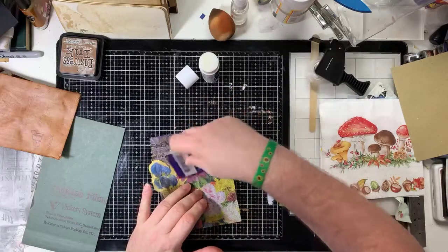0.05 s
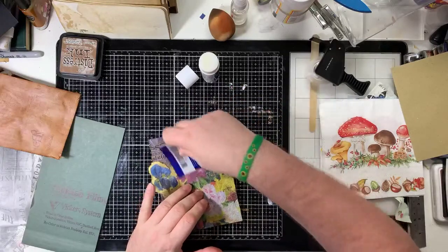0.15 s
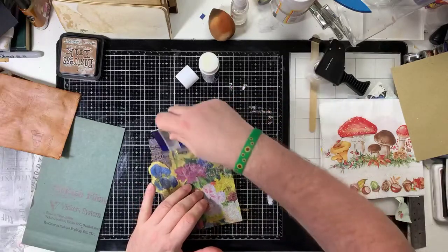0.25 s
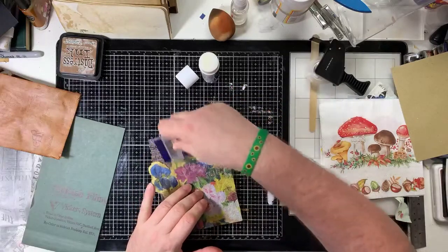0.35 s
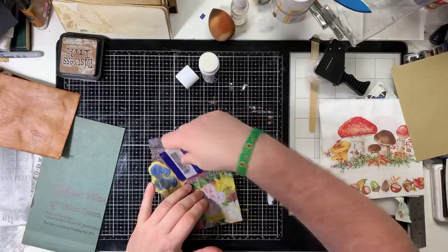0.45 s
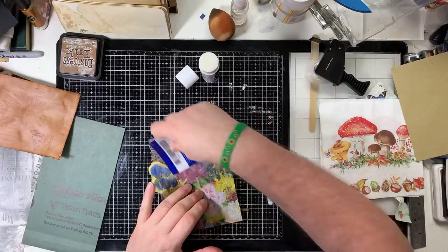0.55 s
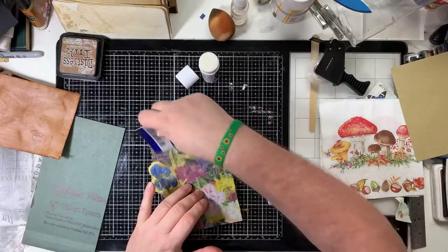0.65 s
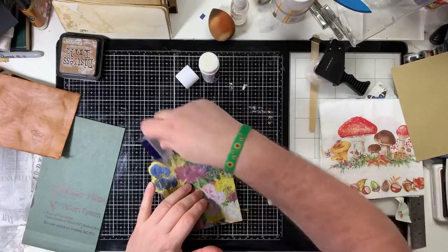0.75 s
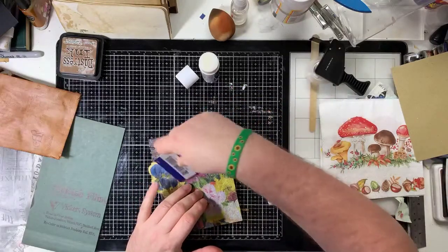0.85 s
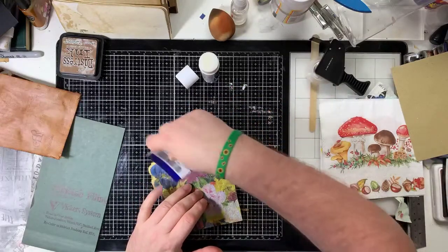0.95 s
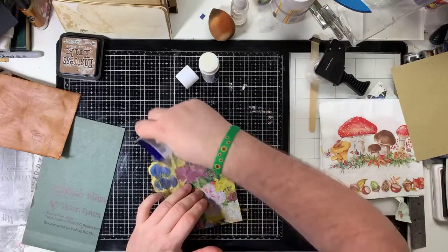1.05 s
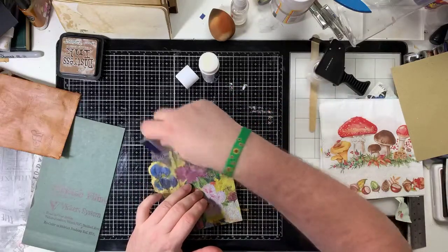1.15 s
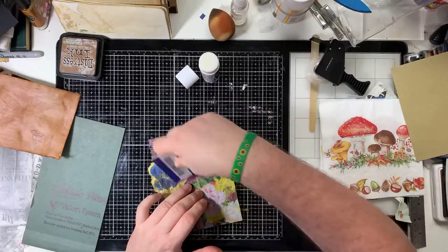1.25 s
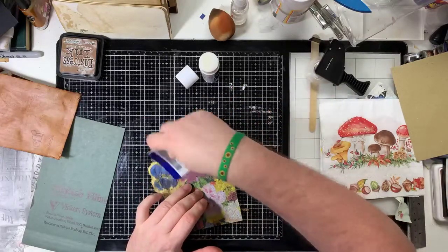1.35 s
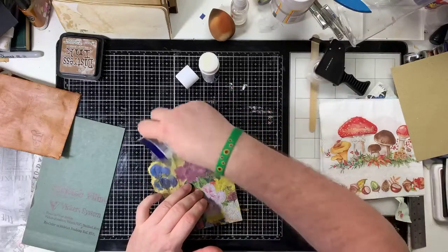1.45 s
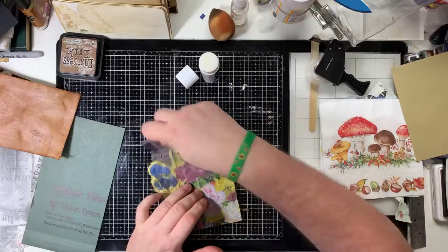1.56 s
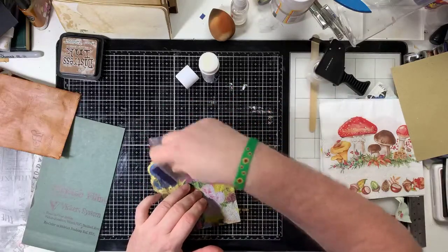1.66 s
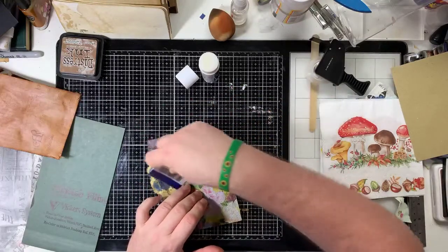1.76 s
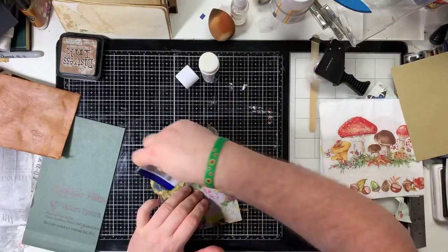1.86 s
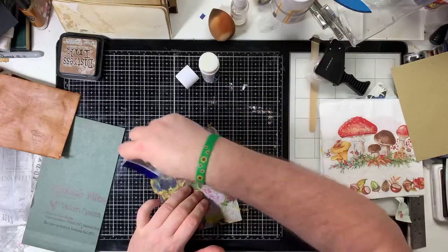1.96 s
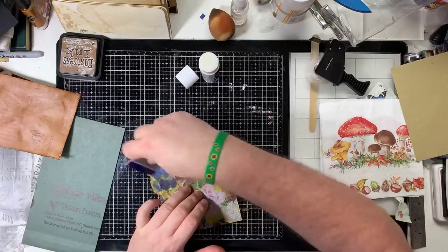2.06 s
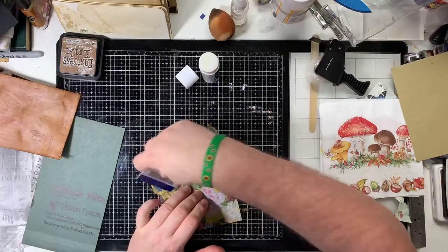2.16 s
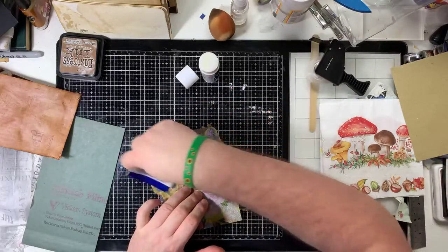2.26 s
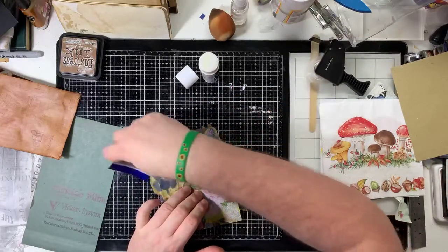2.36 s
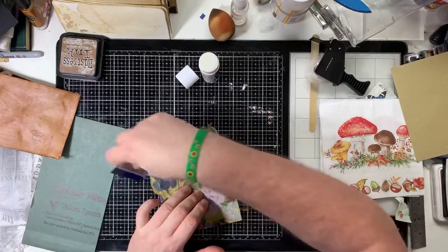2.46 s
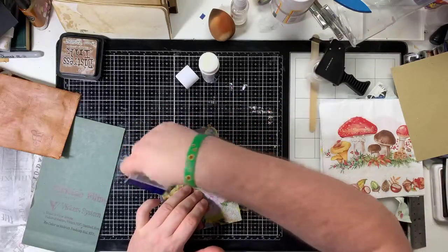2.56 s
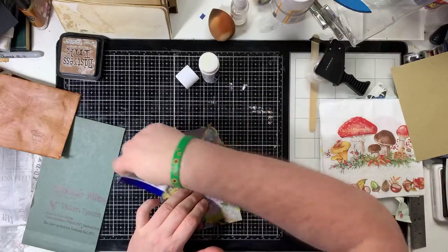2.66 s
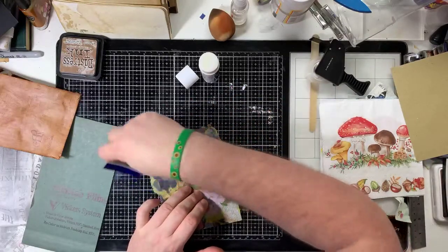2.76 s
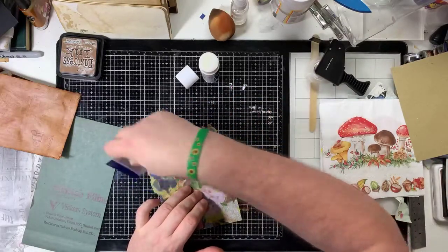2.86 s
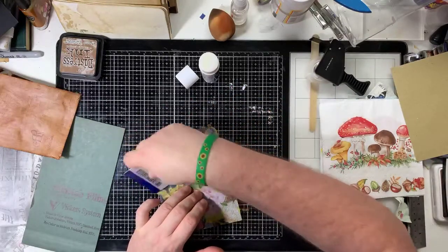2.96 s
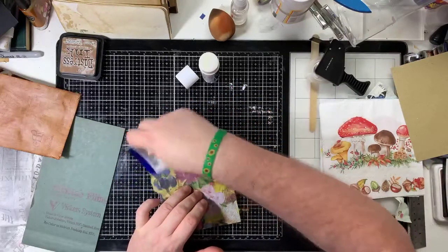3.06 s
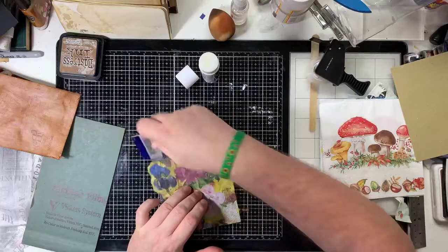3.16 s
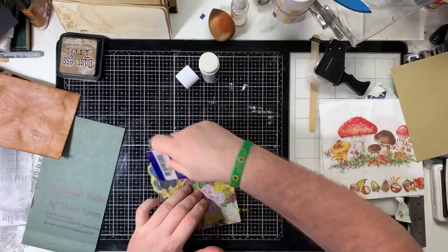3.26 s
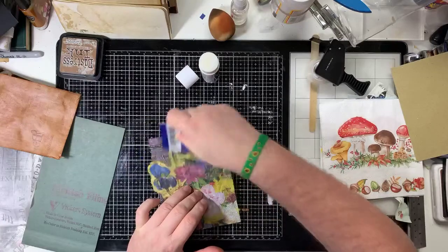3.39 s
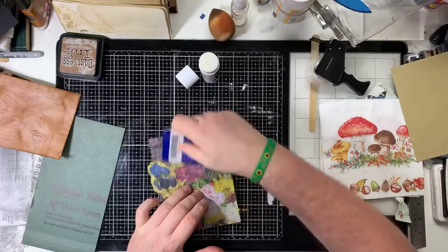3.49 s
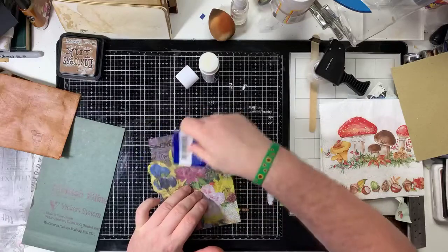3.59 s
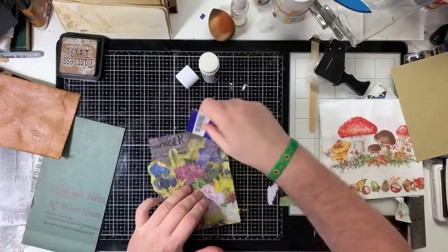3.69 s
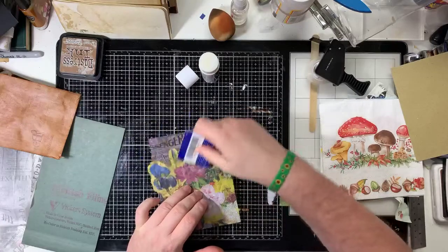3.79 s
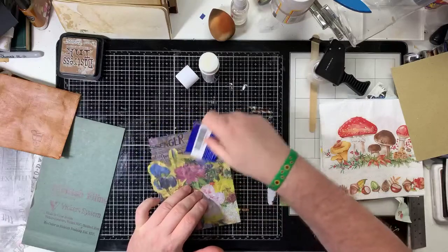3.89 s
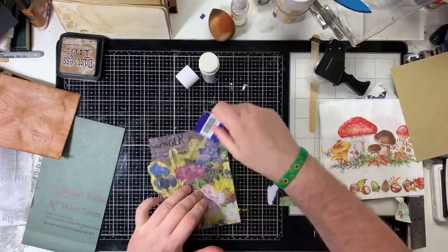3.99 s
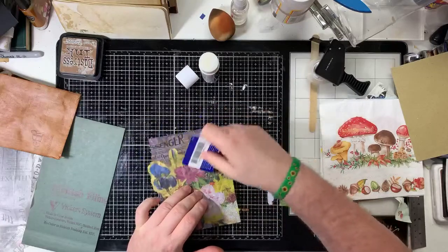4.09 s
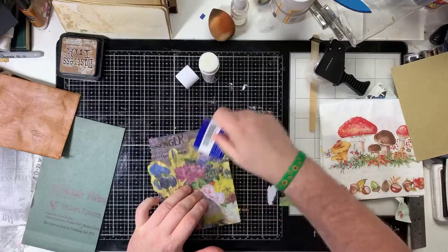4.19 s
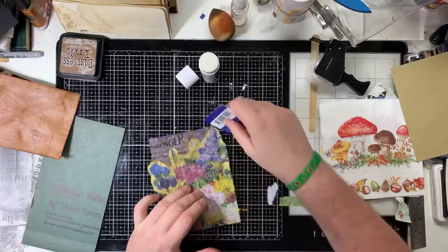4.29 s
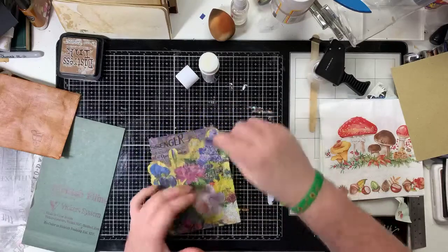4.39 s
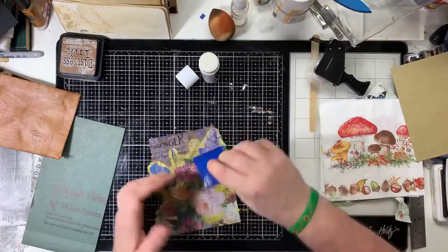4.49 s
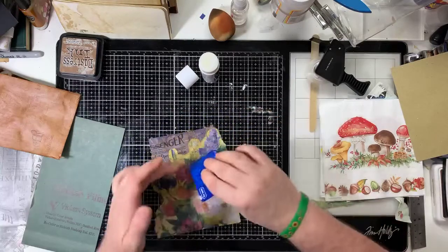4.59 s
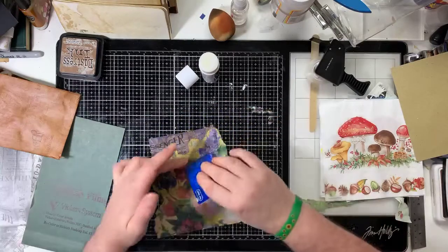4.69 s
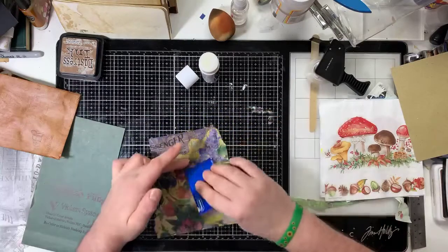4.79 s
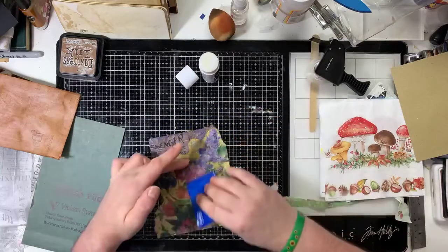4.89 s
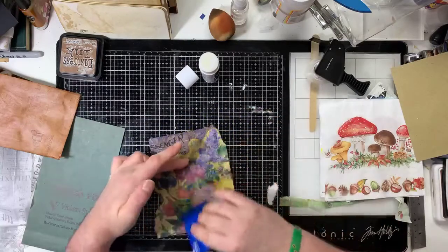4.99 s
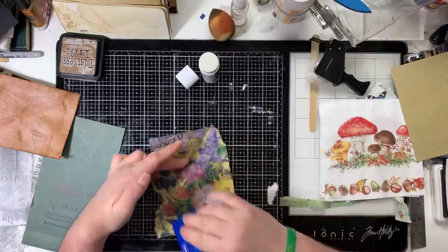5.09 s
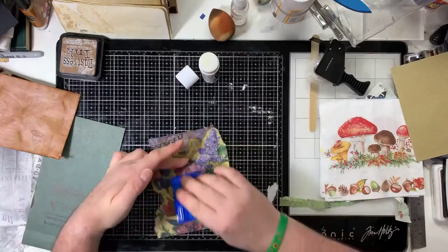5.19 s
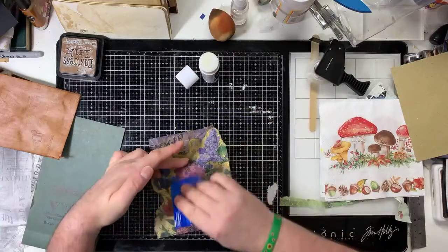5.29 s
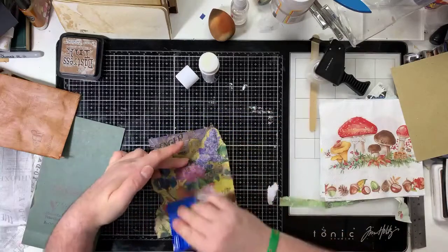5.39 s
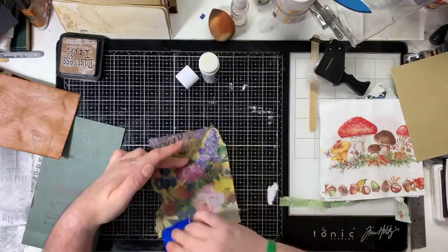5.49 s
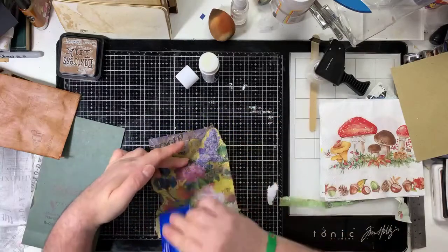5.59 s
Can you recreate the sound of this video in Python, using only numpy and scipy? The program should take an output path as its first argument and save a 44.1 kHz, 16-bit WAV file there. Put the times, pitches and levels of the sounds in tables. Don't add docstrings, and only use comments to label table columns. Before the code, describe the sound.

Repeated brisk paper rubbing, heard close up in a small dry room: tick, dull low thump, then a rising raspy swish ending in a short papery flick. One sharp click stands out just before the middle. Late strokes are more widely spaced and softer, with soft thuds from the desk top and very faint steady hiss between.

```python
import sys
import numpy as np
from scipy import signal
from scipy.fft import rfft, irfft, next_fast_len
from scipy.io import wavfile
from scipy.ndimage import uniform_filter1d, map_coordinates

SR = 44100
rng = np.random.default_rng(int(sys.argv[2]) if len(sys.argv) > 2 else 0)


def amplitude_ratio(level_db):
    exponent = np.asarray(level_db, float) / 20
    return 10 ** exponent


def digitize_waveform(pressure):
    field = np.atleast_2d(pressure).T
    bounded = np.clip(field, -1, 1)
    quanta = np.round(bounded * 32767).astype(np.int16)
    wavfile.write(sys.argv[1], SR, quanta)


N = 248724

# [t/s, tick peak level/dB, knock
# level re tick/dB, skid hiss level/dB]
LANDINGS = [(0.3442, -44, -13, -62), (0.7493, -50, -5, -48.5), (0.937, -36, -5.5, -70),
            (1.1791, -35, -8, -48.5), (1.1872, -38, -14, -56), (1.603, -36.5, -3.5, -52),
            (2.0572, -38, 3.5, -52.5), (2.4599, -35.5, 0.5, -49.5), (2.601, -16, -17, -45),
            (2.8346, -39, -8.5, -61), (3.1355, -31, -6.5, -50), (3.4202, -29.5, -24, -38.5),
            (3.432, -42, -20, -57), (3.6363, -50, -28, -75), (3.6484, -60, -22, -75),
            (3.6977, -41, -14, -48.5), (3.9869, -49, -20, -49.5), (4.547, -66, -22, -72),
            (5.1098, -39, -30, -50), (5.5734, -36, -9, -49)]
# [f/Hz, width/Hz, level/dB]
TOOL_MODES = [(5807, 547, 3.5), (7670, 900, -3), (5064, 1380, -3.5), (6470, 720, -3.5), (8760, 760, -9.5)]
# [f/Hz, width/Hz, level/dB]
SHEET_MODES = [(918, 370, -1.5), (1326, 595, 2), (446, 280, -4), (2080, 1200, -4.5)]
# [f/Hz, width/Hz, level/dB]
SCRAPE_MODES = [(2955, 166, 3), (4000, 980, -1), (2480, 710, -5)]


def rubbing():
    # [f/Hz, width/Hz, level/dB]
    fizz_modes = [(9430, 1500, -2), (13160, 3500, -3), (13750, 2240, -1.5)]
    # [f/Hz, width/Hz, level/dB]
    desk_modes = [(63.6, 34, -2.5), (105, 32, -4.5), (124, 30, -1.5), (245.5, 56, -4.5), (338, 200, -7.5)]

    hiss_db, slack_db, taut_db, scrape_db, fizz_db = stroke_curves()
    fizz_db -= 14 * np.exp(-since_landing() / 0.012)

    grain = 0.54 * wobble(400) + 0.55 * wobble(80)
    hiss = part(TOOL_MODES, (3500, 10000), grain, spread_db=1.76, fine_db=0.0, broad_db=2.5)
    slack = part(SHEET_MODES[::2], (400, 1300), grain + 0.97 * wobble(60),
                 spread_db=1.43, fine_db=4.5, broad_db=0.16)
    taut = part(SHEET_MODES[1::2], (900, 3000), grain + 2.4 * wobble(60),
                spread_db=2.06, fine_db=2.0, broad_db=2.0)
    scrape = part(SCRAPE_MODES, (1800, 5000), grain + 0.89 * wobble(60),
                  spread_db=2.03, fine_db=4.0, broad_db=1.5)
    fizz = part(fizz_modes, (8000, 15000), grain, spread_db=2.1, fine_db=2.0, broad_db=1.0)

    drag_db = 0.6 * (hiss_db + slack_db + 42.0) + 0.83 * wobble(4.3)
    drag = amplitude_ratio(drag_db) * rng.standard_normal(N)
    rumble = amplitude_ratio(-31.5) * filtered(drag, body(desk_modes, (40, 600)))

    contact = uniform_filter1d(amplitude_ratio(hiss_db - 1.0), size=240)
    slack_db -= 0.11 * np.maximum(hiss_db + 37, 0)
    sheet = amplitude_ratio(slack_db + 1.0) * slack + amplitude_ratio(taut_db) * taut
    return contact * (hiss + sheet + amplitude_ratio(scrape_db) * scrape + amplitude_ratio(fizz_db) * fizz) + rumble


def stroke_curves():
    t = np.arange(N) / SR
    hiss_db, (load_db, edge_db, dry_db, hold_db, lifted), buckle_db = strokes(t)
    flick_db = flicks(t)
    hiss_db = add_trails(t, hiss_db, load_db, edge_db, lifted)

    flat_db = np.zeros(N)
    for s, _, knock_db, skid_db in LANDINGS:
        flat_db[t >= s] = 0.33 * (knock_db + 12.5)
        skid = np.where(t >= s, skid_db - 423 * (t - s), -120)
        hiss_db = np.maximum(hiss_db, skid)

    level_db, per_speed, per_load = [-22, -13.5, -0.5], [0.41, 0.15, 0.24], [0.6, 1, 0.065]
    per_buckle, per_flick = [0.82, 0.61, 0.18], [0.1, 0.92, 0.99]
    on_landing_db, after_lift_db = [9.5, -5, -2.4], [6, 1.5, 5.5]
    slowness_db = np.clip(hiss_db + 38.5, -25, 0)
    landed = np.exp(-since_landing() / 0.025)
    parts = []
    for k in range(3):
        part_db = level_db[k] - per_speed[k] * slowness_db + per_load[k] * load_db
        part_db = part_db + per_buckle[k] * buckle_db[k] - per_flick[k] * np.maximum(flick_db, 0)
        part_db = part_db + (on_landing_db[k] + flat_db) * landed - after_lift_db[k] * lifted
        parts.append(part_db)
    return hiss_db + flick_db, parts[0] - hold_db, parts[1] + hold_db, parts[2] + edge_db, dry_db


def strokes(t):
    # [sets off t/s, up to speed t/s, hiss level there/dB, lifts t/s, hiss level there/dB]
    moves = [(-0.005, 0.078, -37, 0.13, -36), (0.357, 0.476, -43, 0.55, -37),
             (0.784, 0.904, -41, 0.96, -34.5), (1.222, 1.317, -41, 1.357, -33.5),
             (1.693, 1.754, -48, 1.8593, -39), (2.078, 2.137, -49, 2.252, -42.5),
             (2.488, 2.614, -39.5, 2.619, -33.5), (2.846, 2.923, -39.5, 2.974, -36.5),
             (3.16, 3.226, -36, 3.274, -33.5), (3.444, 3.505, -34.5, 3.553, -38),
             (3.721, 3.755, -38.5, 3.836, -42.5), (4.011, 4.048, -40, 4.13, -40),
             (4.7, 4.802, -40.5, 4.893, -40.5), (5.138, 5.17, -47.5, 5.382, -46.5),
             (5.605, 5.634, -43.5, 5.7, -42)]
    # [creep level/dB, sheet load/dB, buckle before lift/dB, scrape/dB, dryness/dB]
    paper = [(-66.5, 2.5, 1.5, -6.5, -10), (-60.5, 1.5, 7, -6, -7.5), (-58.5, 1.5, 6.5, -6.5, -7),
             (-53, 2, 4.5, -6, -7), (-62, 2, 9, -9, -9.5), (-62, 2.5, 11, -5.5, -9),
             (-65, 1.5, 8.5, -5, -9.5), (-67.5, 3.5, 5.5, -6, -10.5), (-61.5, -6, -1, -8, -14),
             (-54, -5, 8, -9.5, -12.5), (-57.5, -3.5, 9, -6.5, -11.5), (-59.5, -6.5, 8.5, -4.5, -12),
             (-56, -1.5, 5, -9, -13.5), (-60, 0, 1.5, -9, -13.5), (-66, 1, 0, -9.5, -15)]
    # [sheet held taut/dB, bend of the speed-up/0-1, fade after the lift/(dB/s)]
    grip = [(-1, 0.83, 502), (0.5, .75, 501), (1.5, .75, 497), (-0.5, 1, 560), (-1, 0.7, 613),
            (-0.5, 0.6, 471), (0.5, 0.9, 475), (2, 0.85, 523), (2, 0.88, 476.5), (-1, 0.75, 520),
            (-0.5, 0.96, 500), (-0.5, 0.55, 850), (0.5, 0.73, 697), (4.5, 0.7, 476), (2, 0.9, 480)]
    # time before the lift/s, length/s
    buckle_times = [(0.019, 0.051), (0.028, 0.027), (0.026, 0.018)]

    touch = np.array([row[0] for row in LANDINGS])
    hiss_db, buckle_db = np.full(N, -120.), np.zeros((3, N))
    states = np.zeros((5, N))
    load_db, edge_db, dry_db, hold_db, lifted = states
    for move, sheet, hand in zip(moves, paper, grip):
        go, full, full_db, lift, lift_db = move
        creep_db, load, buckle, edge, dryness = sheet
        taut, bend, fade = hand
        now = t >= max(touch[touch <= go], default=0)
        speed_up = np.clip((t - go) / max(full - go, .005), 0, 1) ** bend
        stroke = creep_db + (full_db - creep_db) * speed_up
        stroke = stroke + np.interp(t, [full, lift], [0, lift_db - full_db])
        stroke = stroke - fade * np.maximum(t - lift, 0)
        hover = np.where(t > lift, -77.5 - 51.5 * (t - lift), -120)
        hiss_db[now] = np.maximum(stroke, hover)[now]
        for k, (lead, wide) in enumerate(buckle_times):
            from_peak = t - lift + lead
            width = np.where(t < lift - lead, 0.5 * wide, wide)
            buckle_db[k, now] = (buckle * np.exp(-(from_peak / width) ** 2))[now]
        lifted[now] = np.clip((t[now] - lift) / 0.024, 0, 1)
        load_db[now], edge_db[now], dry_db[now], hold_db[now] = load, edge, dryness, taut
    return hiss_db, states, buckle_db


def flicks(t):
    # [t/s, gain/dB, reach to each side/s]
    wrist = [(0.545, 6, 0.025), (0.966, 5.5, .024), (1.356, 11, .024), (2.25, 7, 0.022), (2.971, 8, 0.026),
             (3.257, 5.5, 0.028), (4.114, 6, 0.019), (4.566, -10, 0.063), (3.745, 1.5, 0.0065),
             (4.03, 2.5, .008), (0.125, 1.5, .03), (5.227, 3, .02), (5.245, -1.5, 0.03), (5.36, 6, 0.034)]
    return sum(db * np.maximum(1 - abs(t - s) / reach, 0) for s, db, reach in wrist)


def add_trails(t, hiss_db, load_db, edge_db, lifted):
    # [from t/s, to t/s, hiss level/dB, sinks by/dB, sheet load/dB]
    light = [
        (1.405, 1.68, -58, 8, -2.5),
        (3.7, 3.64, -71, -2, -11),
        (3.89, 4, -74.5, -2, -14),
        (4.16, 4.35, -63.5, 7, -14),
        (4.33, 4.4, -65, -1.5, -5),
        (4.135, 4.19, -52, 11.5, -2),
        (4.97, 5.07, -72.5, 4, -10),
        (1.91, 2.0, -67.5, 12, -4),
    ]
    for start, end, db, sink_db, load in light:
        outside = np.maximum(np.maximum(start - t, t - end), 0)
        trail = np.interp(t, [start, end], [db, db - sink_db]) - 500 * outside
        heard = trail > hiss_db
        load_db[heard] = load
        edge_db[heard] = -13.5 + 0.6 * load
        lifted[heard] = 0
        hiss_db = np.maximum(hiss_db, trail)
    return hiss_db


def since_landing():
    t = np.arange(N) / SR
    touch = np.sort([0] + [row[0] for row in LANDINGS])
    return t - touch[np.searchsorted(touch, t, side="right") - 1]


def part(modes, skirt_hz, clump_db, spread_db, fine_db, broad_db):
    ringing = filtered(slips(spread_db, amplitude_ratio(clump_db)), body(modes, skirt_hz))
    return unit(shifting(ringing, fine_db, broad_db))


def slips(spread_db, clump):
    return rng.standard_normal(N) * amplitude_ratio(spread_db * rng.exponential(size=N)) * clump


def shifting(x, fine_db, broad_db):
    z = signal.stft(x, nperseg=1024)[2]

    def patch(high, long):
        rough = uniform_filter1d(rng.standard_normal(z.shape), size=high, axis=0)
        return unit(uniform_filter1d(rough, size=long, axis=1))

    gain_db = fine_db * np.minimum(patch(2, 6), 2) + broad_db * patch(14, 4)
    return signal.istft(z * amplitude_ratio(gain_db), nperseg=1024)[1][:N]


def landings():
    tick, knock = np.zeros(N + SR), np.zeros(N + SR)
    t = np.arange(SR // 20) / SR
    for s, db, knock_db, _ in LANDINGS:
        at = round(s * SR)
        jolts = amplitude_ratio(2.4 * np.repeat(rng.standard_normal(len(t) // 45), 45))
        crackle = jolts * rng.standard_normal(len(t))
        tick[at:at + len(t)] += amplitude_ratio(db - 60 * t / 0.022) * (1 - np.exp(-t / 0.00038)) * crackle
        knock_swell = amplitude_ratio(db + knock_db - 60 * t / 0.13) * (1 - np.exp(-t / 0.00165))
        knock[at:at + len(t)] += knock_swell * rng.standard_normal(len(t))
    edge_ring = filtered(tick[:N], body(TOOL_MODES[:4] + SCRAPE_MODES, (2000, 7000)))
    sheet_ring = filtered(knock[:N], body(SHEET_MODES, (300, 1800)))
    return amplitude_ratio(-2.0) * edge_ring + amplitude_ratio(4.5) * shifting(sheet_ring, 0, 1.7)


def desk():
    # [t/s, peak level/dB, f/Hz]
    pushes = [(0.009, -45, 105), (0.352, -61, 113.3), (0.523, -45, 121.6), (0.754, -41, 104.2),
              (0.927, -43, 110), (1.185, -38.5, 115.6), (1.333, -50.5, 116), (1.607, -41.5, 105),
              (1.804, -50, 112.7), (2.063, -41, 118), (2.222, -46.5, 135.5), (2.463, -49.5, 119.5),
              (2.594, -46.5, 116), (2.84, -45.5, 112), (2.951, -50.5, 103), (3.137, -43.5, 102),
              (3.432, -44.5, 107.5), (3.709, -42.5, 103), (3.996, -42, 89), (4.602, -52, 78),
              (5.119, -40, 96.8), (5.575, -37.5, 101.6)]
    rise_s, rebound_s = 0.011, 0.038
    out, t = np.zeros(N + SR), np.arange(SR // 3) / SR

    def swing(hz):
        return np.sin(2 * np.pi * hz * t)

    for s, db, hz in pushes:
        rebound, lower, quick = amplitude_ratio(rng.normal(0, 1.5, size=3))
        swell = (t / rise_s * np.exp(1 - t / rise_s)) ** 3.1
        push = swell * (swing(hz) + 0.17 * quick * swing(2.9 * hz))
        fade = amplitude_ratio(-60 * t / 0.19) * (1 - np.exp(-t / 0.016))
        linger = fade * (swing(1.4 * hz) + lower * swing(0.63 * hz))
        out[round(s * SR):][:len(t)] -= amplitude_ratio(db - 6.5) * (push + 0.39 * linger)
        for k, share in enumerate([.45, .2]):
            at = round((s + (k + 1) * rebound_s) * SR)
            out[at:][:len(t)] -= amplitude_ratio(db - 9.0) * share * rebound * push
    return out[:N]


def room(x):
    # [f/Hz, t/s]
    decay = [(100, 0.35), (1000, 0.1), (6000, 0.14), (14000, 0.2)]
    hz, t, z = signal.stft(rng.standard_normal(SR // 2), SR, nperseg=256)
    fade = amplitude_ratio(-60 * t / along(decay, hz)[:, None])
    tail = signal.istft(z * fade, SR, nperseg=256)[1]
    delayed = np.pad(x, (200, 0))
    return signal.fftconvolve(delayed, tail / np.linalg.norm(tail))[:N]


def air():
    # [f/Hz, level per Hz/dB]
    colour = [(15, -58.5), (25, -6), (250, -3.5), (684, -6), (1900, -16.5), (3530, -17.5), (14300, -21.5),
              (15500, -35)]
    still = unit(filtered(rng.standard_normal(N), lambda hz: amplitude_ratio(along(colour, hz))))
    murmur = filtered(still, lambda hz: 1 / (1 + (hz / 600) ** 4))
    drift = amplitude_ratio(2.3 * wobble(6.4)) - 1
    return amplitude_ratio(-77.5) * (still + drift * murmur)


def body(modes, skirt_hz):
    low, high = skirt_hz

    def response(f):
        ring = 0
        for k, (c, w, db) in enumerate(sorted(modes)):
            ring = ring + (-1) ** k * amplitude_ratio(db) * 1j * f * w / (c * c - f * f + 1j * f * w)
        return ring * (1j * f / low / (1 + 1j * f / low) / (1 + 1j * f / high)) ** 2

    return response


def filtered(x, response):
    m = next_fast_len(N + SR // 2)
    return irfft(rfft(x, m) * response(np.fft.rfftfreq(m, 1 / SR)), m)[:N]


def wobble(rate):
    knots = rng.standard_normal(int(N * rate / SR) + 4)
    return map_coordinates(knots, [np.arange(N) * rate / SR])


def along(points, hz):
    f, v = np.transpose(points)
    return np.interp(np.log(hz + 1), np.log(f + 1), v)


def unit(x):
    return x / np.sqrt(np.mean(x ** 2) + 1e-20)


def scene():
    near = rubbing() + landings()
    return (near + amplitude_ratio(-7.5) * room(near) + desk() + air())[None]


def roll_off(x):
    return signal.sosfilt(signal.butter(12, 15710, fs=SR, output="sos"), x)


def record(dry):
    def microphone(hz):
        return (1j * hz / 35 / (1 + 1j * hz / 35)) ** 2 / (1 + (hz / 14900) ** 36)

    return roll_off(filtered(dry[0], microphone)[None])


dry = scene()
out = record(dry)
digitize_waveform(out)
```